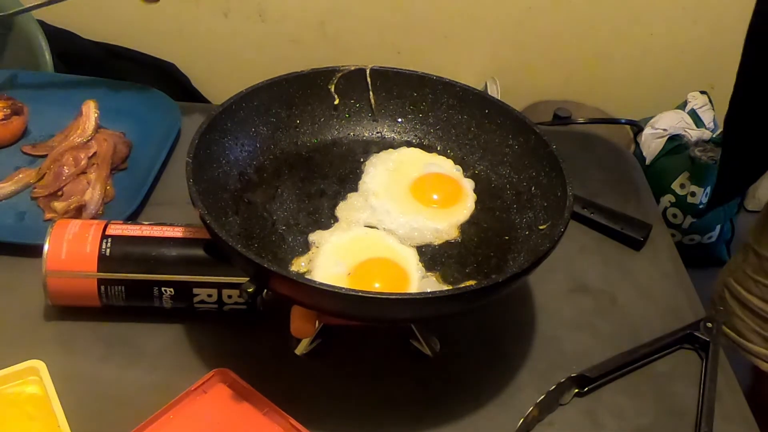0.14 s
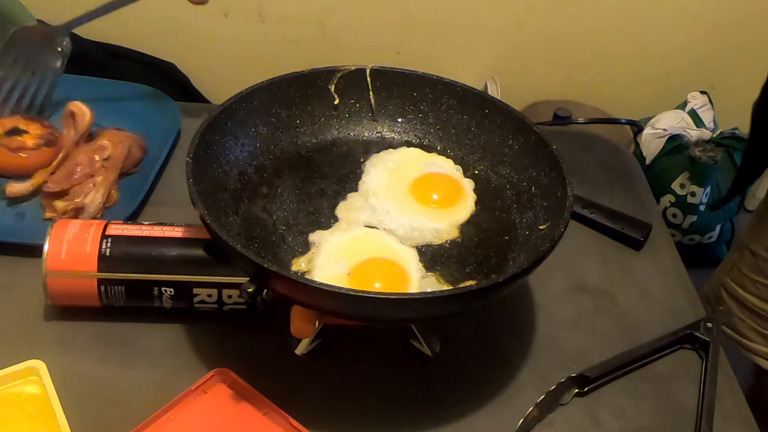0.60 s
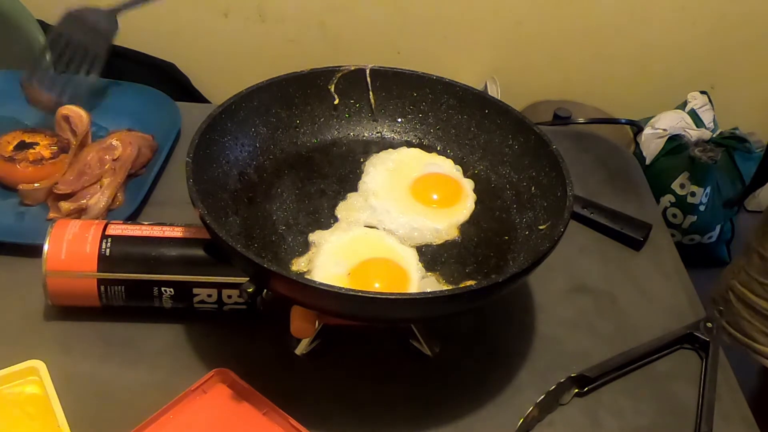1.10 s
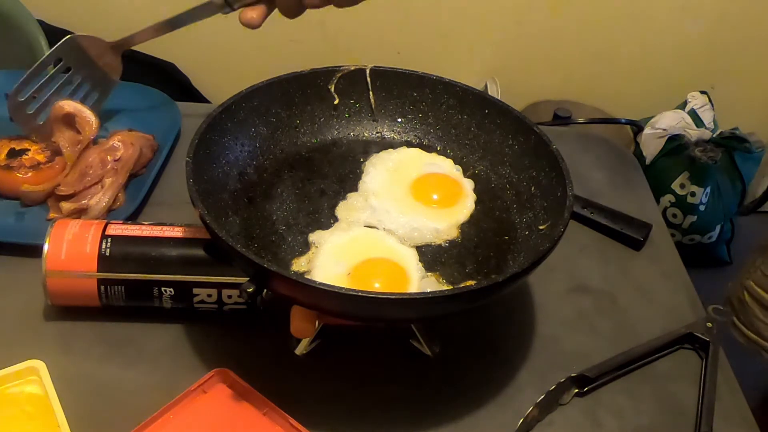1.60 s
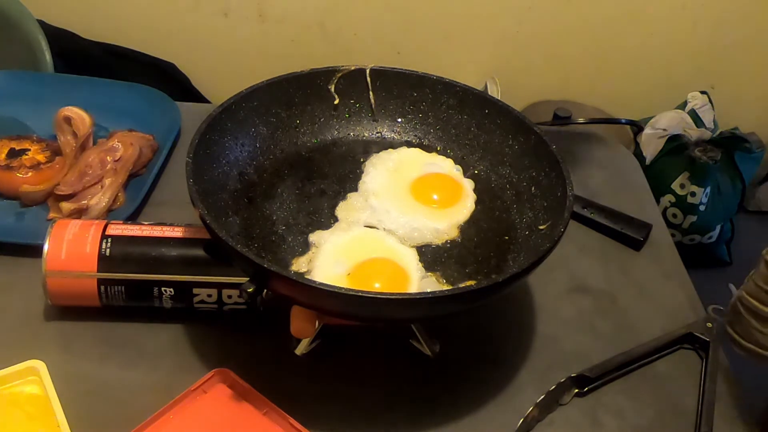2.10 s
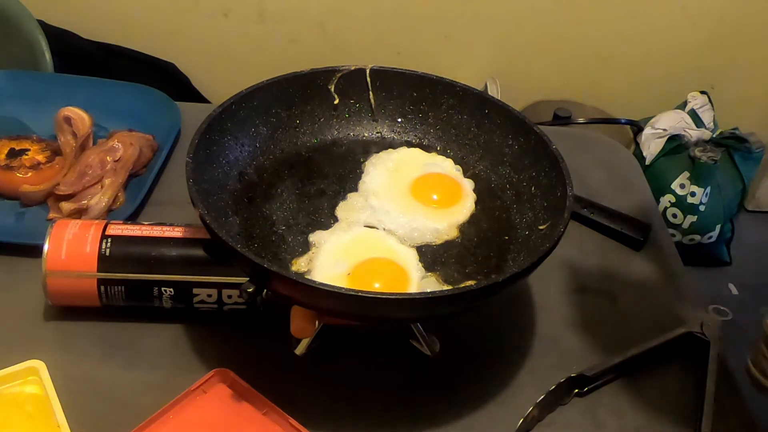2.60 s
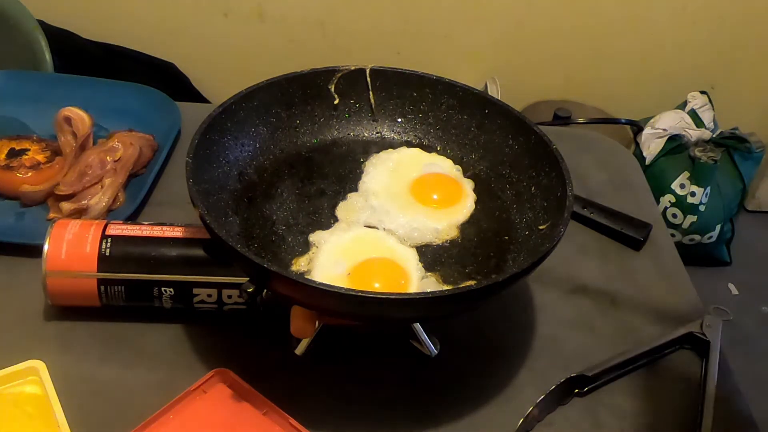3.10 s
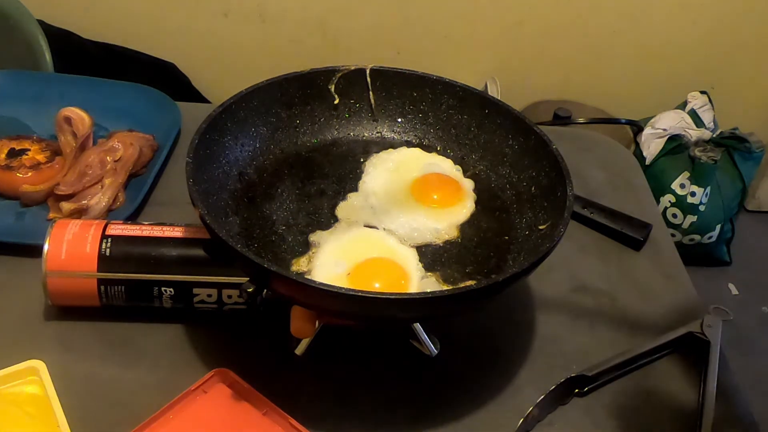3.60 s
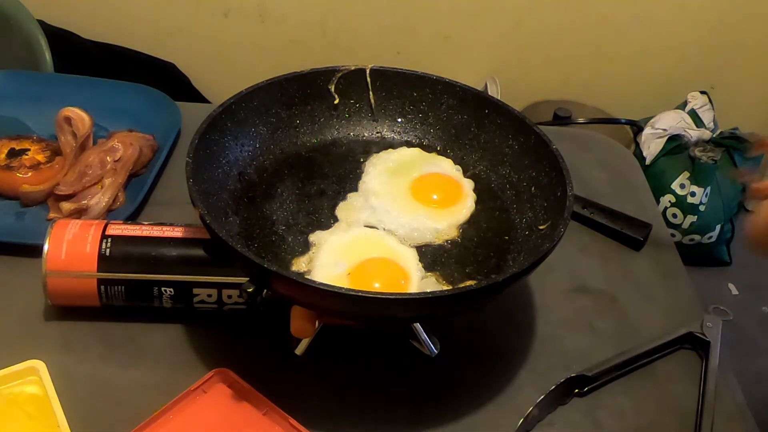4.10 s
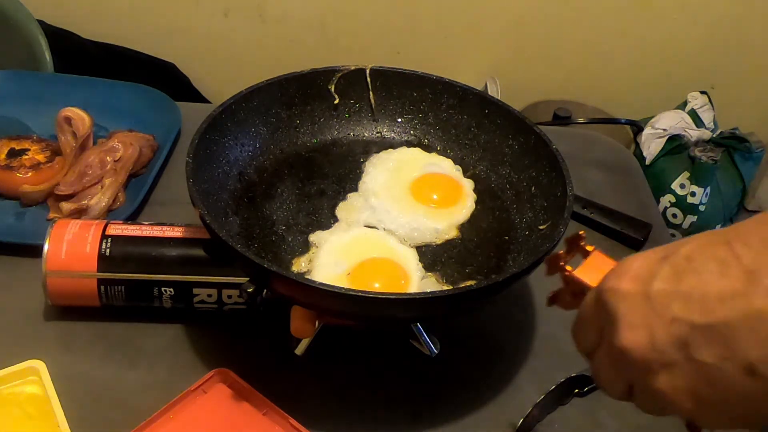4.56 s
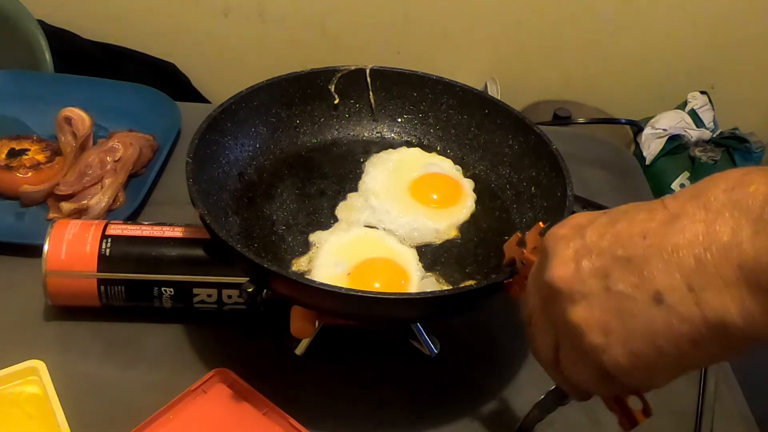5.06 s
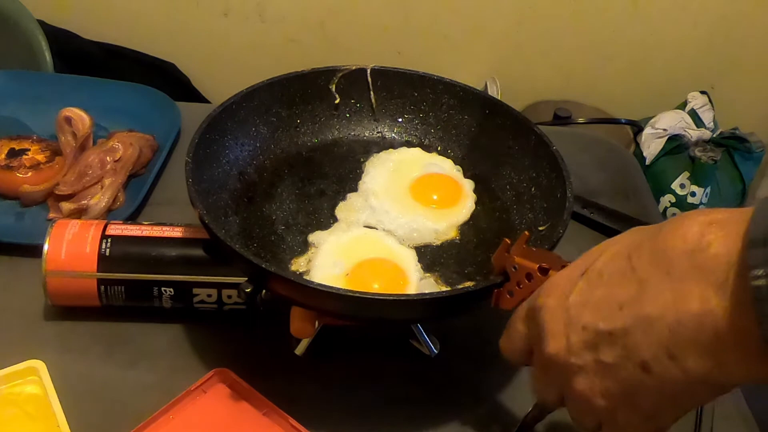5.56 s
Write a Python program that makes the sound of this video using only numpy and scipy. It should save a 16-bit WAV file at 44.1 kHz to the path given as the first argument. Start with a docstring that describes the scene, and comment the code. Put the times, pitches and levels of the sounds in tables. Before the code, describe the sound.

Eggs sizzle in a pan over a softly hissing gas flame, popping sharply, after a double tap on plastic and before metallic clinks.

```python
"""Two quick knocks of a spatula on a plastic tray come first, with fat already sizzling behind them.
Two eggs fry in a pan on a small gas burner in a hard-walled corner, close to the microphone. Steam bubbles
crack and ring: small ones in swarms as a sizzle, large ones as pitched spits and deep plops. Struck tray
and metal tool ring in modes; drag, rustle, flame and rumble are shaped noise; echoes and a tail add the corner."""
import sys
import numpy as np
from scipy import signal
from scipy.fft import rfft, irfft
from scipy.io import wavfile
from scipy.ndimage import uniform_filter1d

SR = 44100
rng = np.random.default_rng(int(sys.argv[2]) if len(sys.argv) > 2 else 0)


def pcm_store(signal):
    """Save signal as 16-bit PCM."""
    levels = np.round(np.clip(np.atleast_2d(signal), -1, 1) * 32767)
    wavfile.write(sys.argv[1], SR, levels.astype(np.int16).T)


def voltage_ratio(level):
    """Linear amplitude factor for a level in decibels (scalar or array-like)."""
    return 10 ** (np.asarray(level, float) / 20)


N = 250929  # length in samples

# In all tables levels are before panning, room and microphone; colours give only the shape of a spectrum.
# loudest bursting bubbles: start_s, level_db, pitch_hz, ring_cycles, crack_db (against the ring)
SPITS = [(.2253, -27.5, 6700, 3.2, -9), (.2404, -27, 6760, 2.8, -14), (.3806, -27, 4550, 3.3, 6),
         (.3835, -28.5, 3630, 1.5, 16), (.4, -20.5, 4160, 3.7, -25), (.476, -27.5, 5300, 3.0, 2.5),
         (.543, -29, 9200, 2.4, -11), (.5804, -27.5, 6330, 2.3, -5), (.6177, -30, 6200, 3.0, -18),
         (.6404, -34, 3840, 3.3, 11.5), (.7138, -24.5, 5880, 4.2, -15), (.7701, -26, 5540, 4.8, -3),
         (.78, -31, 6200, 2.8, -15), (.845, -26.5, 3200, 1.3, -2.5), (.9692, -29, 6850, 2.6, -11),
         (1.1051, -21.5, 3810, 1.8, -12), (1.1124, -29, 3760, 2.1, -7), (1.136, -30, 7000, 2.4, -6),
         (1.2584, -31, 3460, 2.4, -11), (1.3458, -22.5, 3320, 1.6, -1.5), (1.3539, -21, 9210, 3.0, -7),
         (1.3614, -28, 3770, 3.0, -7), (1.3694, -29, 3680, 1.2, 4.5), (1.3774, -24.5, 3190, 1.8, -3),
         (1.4446, -29, 3660, 3.0, -4), (1.4635, -28, 4900, 3.3, -11), (1.517, -25, 7000, 3.5, -12),
         (1.5947, -32.5, 7880, 2.2, 14.5), (1.6004, -28, 9300, 3.0, -7), (1.7629, -24.5, 11000, 1.9, -3),
         (1.956, -35, 8840, 2.2, 3), (2.0532, -33, 9000, 1.5, 7), (2.0607, -26, 5980, 4, -3),
         (2.496, -31, 12500, 2.5, -9), (2.5633, -26, 5530, 2.2, -14), (2.582, -29, 6000, 2.8, 4),
         (2.6256, -23.5, 4080, 2.6, -5), (2.6785, -18, 8720, 1.5, 1.5), (2.6862, -22, 7700, 1.6, 3),
         (3.2614, -32.5, 6530, 3.0, -14), (3.3446, -32, 9400, 3.8, -9), (3.349, -31, 9140, 5.8, -12),
         (3.447, -30, 9000, 2.8, -4), (3.472, -24.5, 8500, 1.4, -6), (3.6325, -29, 3470, 2.2, -12),
         (3.824, -33, 7140, 1.9, 1.5), (3.9698, -33, 8090, 3.3, 3), (3.9774, -19.5, 5300, 2.9, -14),
         (4.0306, -20.5, 4640, 4.3, -9.5), (4.1687, -26.5, 3080, 1.1, 4), (4.2382, -33, 8500, 1.5, 5),
         (4.2438, -27.5, 3350, 1.8, -3), (4.2854, -24, 6800, 1.9, -5), (4.3084, -27, 6000, 2.2, -11),
         (4.7355, -31, 8130, 3.0, -7), (4.8485, -32, 7300, 2.7, -7), (5.138, -24, 9000, 1.6, -6),
         (5.1739, -33, 5400, 4.9, .6), (5.2178, -24.5, 8250, 2.8, -5), (5.449, -33, 8100, 2.2, -2.5),
         (5.5156, -23, 8960, 2.2, 2.5), (5.5435, -29, 8700, 1.8, 7), (5.5826, -28.5, 3240, 1.7, -7),
         (5.645, -31, 12000, 2.2, -3), (5.672, -33, 3200, 2.3, 5)]
# as heard, the bursts have no bass and fade in the top octave: freq_hz, gain_db
BURST_COLOUR = [(100, -50), (700, -12), (1500, 0), (9500, 3.5), (13000, -1.5), (16000, -22)]
# large slow bubbles that plop: start_s, level_db, pitch_hz, ring_cycles, crack_db (against the ring)
PLOPS = [(1.0327, -21.5, 1420, .85, .7), (1.4722, -35, 1010, 2.1, -12.5), (3.5719, -17.5, 1260, 1.55, -6.5),
         (3.6062, -33.5, 1710, 2.1, -10.5), (3.8852, -32.5, 1110, .95, -3.5), (5.2326, -24.5, 1800, .9, -4),
         (5.5614, -30.5, 1810, 5.3, -13.5)]
# strength of the sizzle, before its trim: time_s, level_db
SIZZLE_LEVEL = [(0.0, -45), (.2, -60), (.46, -49), (.78, -57), (1.12, -54), (2.0, -54), (2.52, -48.5),
                (2.71, -53.5), (3.07, -51), (3.2, -55.5), (3.36, -54.5), (3.84, -59.5), (4.15, -58.5),
                (4.28, -51.5), (4.6, -64), (5.13, -57), (5.31, -62), (5.69, -52.5)]
# spectrum of the sizzle filter: freq_hz, gain_db
SIZZLE_COLOUR = [(470, -18), (800, -9), (1320, 3), (1660, -19.5), (2410, -17), (2900, -.6), (4340, -1.5),
                 (4860, -3.5), (6570, -5.5), (9330, -.6), (13000, -18), (16000, -45)]
# a water pocket explodes and sprays fat: start_s, level_db (first 20 ms), spray_s, tilt_db_per_octave, thump_db
SPLATTER = (2.3253, -30.5, .008, .1, -70)
# spectrum of the spray: freq_hz, density_db_per_hz
SPLATTER_COLOUR = [(880, -63), (1500, -33), (2370, -24), (4240, -11), (6300, -11), (7690, -2.5),
                   (8490, -10), (9650, -8), (10700, -22), (12600, -19), (16000, -38)]
# modes of the exploding pocket: pitch_hz, level_db, t60_s
POCKET_MODES = [(3000, -9, .012), (3550, -3, .01), (7600, -3, .01), (9400, -8, .008)]
# spatula blows on the tray: start_s, level_db (first 20 ms), rattle_s, tilt_db_per_octave, thump_db (counter)
KNOCKS = [(.0273, -21.5, .0085, .3, -29.5), (.0452, -21, .021, -.3, -28.5), (.2873, -36, .004, 1.6, -28.5)]
# modes of the plastic tray: pitch_hz, level_db, t60_s
TRAY_MODES = [(438, -4, 0.1), (493, -7, 0.06), (614, -8, 0.053), (800, -8, .06), (1154, -11, 0.045),
              (2040, 5, .03), (3200, -18, 0.045), (4260, -16, 0.02)]
# spectrum of the crack on the tray: freq_hz, density_db_per_hz
TRAY_COLOUR = [(24, -65), (50, -40), (160, 5), (284, -11), (432, -6), (582, -5), (1000, -11.5), (3220, -16),
               (8910, -38.5), (15000, -79)]
# metal tool hitting and bouncing: start_s, level_db (first 20 ms), rattle_s, tilt_db_per_octave, thump_db
CLATTER = [(4.4819, -46, .0021, -2.5, -56), (4.4858, -25.5, .0036, 1.6, -50),
           (4.4937, -24.5, .0034, .9, -50), (4.5097, -22.5, .0028, -2.2, -40),
           (4.5172, -32, .0042, 4.2, -56), (4.6182, -48, .0042, -6.5, -42), (4.6522, -47, .0042, -1.1, -52),
           (4.69, -55, .0042, -3.2, -43), (5.0962, -55, .016, -7.5, -52), (5.254, -31, .004, .7, -53),
           (5.2632, -38, .0032, 4.2, -60)]
# modes of the metal tool: pitch_hz, level_db, t60_s
TOOL_MODES = [(1180, -1.5, .018), (1723, -6, .028), (1980, -27, .5), (2071, -19.5, .75), (2200, -28, .4),
              (2550, -2.5, .011), (2790, -26, .55), (2910, -26, .5), (3800, -5.5, .011), (7530, -9, .009),
              (8540, -7, .009)]
# spectrum of the crack of the tool: freq_hz, density_db_per_hz
TOOL_COLOUR = [(60, -60), (170, -27), (560, -32), (850, -6), (1300, -1.5), (1700, -.6), (2800, -4),
               (4200, -6), (6000, -14), (8200, -8), (9800, -14), (12000, -30), (16000, -48)]
# modes of the counter under every blow: pitch_hz, level_db, t60_s
COUNTER_MODES = [(95, -5, .1), (135, -1.5, .17), (175, -1.5, 0.11), (215, -4, .13), (320, -5, 0.11)]
# spatula strokes on the tray, later a hand on the counter: start_s, rise_s, top_db, sag_db_per_s, end_s
DRAG_STROKES = [(.33, .14, -45, 4, .68), (1.44, .03, -45, 60, 1.61), (1.725, .015, -50.5, 110, 1.84),
                (4.59, .03, -46, 300, 4.66), (5.09, .01, -45, 75, 5.24)]
# spectrum of the drag: freq_hz, density_db_per_hz
DRAG_COLOUR = [(35, -70), (60, -62), (157, -5), (240, -21), (297, -3), (360, -8.5), (490, -10),
               (857, -13.5), (1000, -6.5), (1750, -19), (6000, -23), (7800, -45), (13200, -120)]
# the dragged tray judders on its low resonances: time_s, level_db
JUDDER_LEVEL = [(0.56, -57), (0.622, -39), (0.652, -50), (0.684, -37.5), (0.714, -49), (0.742, -53),
                (0.78, -66)]
# those resonances: pitch_hz, width_hz, level_db
JUDDER_PEAKS = [(283, 83, -2), (498, 17, 4), (1000, 54, -16)]
# rustles of cloth or a bag: start_s, rise_s, top_db, sag_db_per_s, end_s
RUSTLE_STROKES = [(.385, .03, -47, 100, .44), (.44, .035, -42, 190, .6), (.61, .028, -50, 70, .73),
                  (2.11, .13, -47, 200, 2.3), (2.425, .025, -41.5, 150, 2.56),
                  (2.835, .028, -39.5, 40, 2.99), (2.975, .125, -31.5, 105, 3.24),
                  (4.6, .03, -47, 30, 4.96)]
# spectrum of the rustle: freq_hz, density_db_per_hz
RUSTLE_COLOUR = [(180, -45), (300, -17), (423, -19), (801, -12.5), (855, -6), (928, -13), (1880, -1.5),
                 (3330, -6.5), (7670, -11.5), (15500, -44)]
# spectrum of the flame: freq_hz, density_db_per_hz
FLAME_COLOUR = [(18, -57), (35, -36), (95, -50), (179, 2.5), (526, -10.5), (721, -6.5), (937, -15),
                (2120, -8.5), (2830, -16), (4910, -12.5), (8980, -13.5), (14400, -34), (15900, -62)]
# burner resonances blown by the gas jet: pitch_hz, width_hz, level_db
JET_PEAKS = [(178, 13.3, -63.5), (736, 8.3, -71), (2780, 190, -58)]
# swells of a dull rumble: start_s, rise_s, top_db, sag_db_per_s, end_s
RUMBLE_SWELLS = [(.4, .03, -64, 35, .85), (1.5, .42, -71, 60, 2.02), (2.5, .17, -69, 3, 2.86),
                 (4.3, .1, -71, 3, 4.7), (4.98, .13, -76, 45, 5.3), (5.35, .25, -61, 90, 5.69)]
# spectrum of the rumble: freq_hz, density_db_per_hz
RUMBLE_COLOUR = [(30, -32), (60, -14), (95, -10), (125, 8), (170, -28), (400, -70)]
# near echoes off pan wall, counter and walls: delay_s, level_db
ECHOES = [(.0013, -12), (.0036, -21.5), (.0064, -9), (.0085, -14), (.011, -10), (0.0175, -40)]
# decay of the room tail: freq_hz, t60_s
ROOM_DECAY = [(150, 0.3), (600, 0.4), (1700, 0.44), (4600, 0.37), (9000, 0.42), (14000, 0.32)]
# likeness of the left and right channels: freq_hz, likeness (1 = identical)
LIKENESS = [(60, 0.55), (250, 0.77), (600, 0.61), (1650, 0.38), (5000, 0.41), (15000, 0.067)]


def bubble(pitch_hz, cycles, crack_db):
    """A bursting bubble: the film cracks, the open cavity rings down and rises a little in pitch."""
    t = np.arange(1500) / SR
    life = t * pitch_hz / max(cycles, .3)
    onset = 1 - np.exp(-t * pitch_hz / .5)
    rising = 1 + 0.017 * np.minimum(life, 3)
    ring = onset * np.exp(-life) * np.sin(2 * np.pi * pitch_hz * t * rising)
    crack = np.exp(-t / .00004)
    return ring + voltage_ratio(crack_db) * crack


def spits():
    """Large bubbles, each at its place in the pan and a hair early or late at the right port; one splatter."""
    pan_left_db, scatter_db = 1.5, 1.5  # the pan sits a little left; bubbles scatter about it
    out = np.zeros((2, N))
    scatter = rng.uniform(-1, 1, (len(SPITS), 2))
    for (start_s, level_db, pitch_hz, cycles, crack_db), (place, early) in zip(SPITS, scatter):
        sound = voltage_ratio(level_db) * bubble(pitch_hz, cycles, crack_db)
        pan_db = pan_left_db + scatter_db * place
        add(out[0], start_s, voltage_ratio(pan_db / 2) * sound)
        add(out[1], start_s + 2.2e-5 * early, voltage_ratio(-pan_db / 2) * sound)
    add(out, *blow(SPLATTER, POCKET_MODES, SPLATTER_COLOUR, ring_db=-4.))
    return coloured(out, BURST_COLOUR)


def plops():
    """Deep bubbles open toward the microphone: the direct sound, and the part that fills the room."""
    out = np.zeros((2, N))
    for start_s, level_db, pitch_hz, cycles, crack_db in PLOPS:
        # a plop that rings longer throws more into the room: 4.5 dB per doubling
        thrown_db = -9 + 4.5 * np.log2(cycles)
        gains = voltage_ratio([[level_db], [level_db + thrown_db]])
        add(out, start_s, gains * bubble(pitch_hz, cycles, crack_db))
    return coloured(out, BURST_COLOUR)


def sizzle(per_s=1200, spread_db=7.4):
    """Swarms of tiny bubbles at 24 pitches, of random strength, scattered over the pan."""
    out = np.zeros((2, N))
    for pitch_hz in np.geomspace(1500, 14000, num=24):
        strength = voltage_ratio(spread_db * np.minimum(rng.exponential(1, N), 3.5))
        bursts = strength * (rng.random(N) < per_s / 24 / SR)
        side_db = rng.uniform(-2.5, 2.5)
        swarm = signal.oaconvolve(bursts, bubble(pitch_hz, 1.88, -2.5) * np.sqrt(pitch_hz))[:N]
        out += voltage_ratio([[side_db], [-side_db]]) * swarm
    return level(SIZZLE_LEVEL) * voltage_ratio(-1.5) * evened(coloured(out, SIZZLE_COLOUR))


def blow(row, modes, colour, ring_db):
    """A short uneven rattle cracks broadly and rings the struck thing; the counter thumps under it."""
    start_s, level_db, rattle_s, tilt_db, thump_db = row
    t = np.arange(SR // 2) / SR
    life = t / max(rattle_s, 1e-4)
    # contacts come and go every 30 samples
    uneven = voltage_ratio(2.2 * rng.standard_normal(len(t) // 30 + 1)).repeat(30)[:len(t)]
    envelope = (1 - np.exp(-t / .0004)) * np.exp(-life ** 1.26)
    push = envelope * uneven * rng.standard_normal(len(t))
    ring = signal.fftconvolve(push, ringing(modes, t))[:len(t)]
    ring = coloured(ring, [(20, 0), (20000, 0)], tilt_db)  # flat but for the tilt
    sound = evened(coloured(push, colour, tilt_db)) + voltage_ratio(ring_db) * evened(ring)
    thump = ringing(COUNTER_MODES, t) * (1 - np.exp(-t / 0.011))
    # 20 ms is 1/25 of the half second, so rms over the whole is 1/5 of rms over those 20 ms
    return start_s, voltage_ratio(level_db) * evened(sound) / 5 + voltage_ratio(thump_db) * thump


def handling():
    """Spatula on the tray and metal tool by the pan, struck things that ring a little to the left."""
    out = np.zeros(N)
    for row in KNOCKS:
        add(out, *blow(row, TRAY_MODES, TRAY_COLOUR, ring_db=-7.5))
    for row in CLATTER:
        add(out, *blow(row, TOOL_MODES, TOOL_COLOUR, ring_db=-9.5))
    return out * voltage_ratio([[.4], [-.4]])


def dragging():
    """Grainy friction noise, with a judder that stirs the tray's low body."""
    noise = evened(grit(1.36) * paired_noise(DRAG_COLOUR, 1.0))
    judder = level(JUDDER_LEVEL) * evened(narrow(JUDDER_PEAKS))
    return strokes(DRAG_STROKES) * noise + judder


def rustling():
    """Cloth or a bag gives a dense grainy swish of noise."""
    return strokes(RUSTLE_STROKES) * evened(grit(1.36) * paired_noise(RUSTLE_COLOUR, 0.83))


def burner():
    """The flame roars softly as drifting noise; the gas jet blows across narrow resonances."""
    return voltage_ratio(-54.5) * paired_noise(FLAME_COLOUR, 1.34) + narrow(JET_PEAKS)


def rumble():
    """Low patchy noise swells dully in the background."""
    return strokes(RUMBLE_SWELLS) * paired_noise(RUMBLE_COLOUR, 3.1)


def room(x, tail_db=-2.0):
    """Near echoes, then sparse taps of random sign whose bands die at their own speed."""
    taps = np.zeros((2, SR // 2))
    # one tap in every 20 samples
    at = np.arange(300, SR // 2 - 20, 20) + rng.integers(0, 20, (2, (SR // 2 - 301) // 20))
    np.put_along_axis(taps, at, rng.choice([-1., 1.], at.shape), 1)
    hz, t, bands = signal.stft(taps, SR, nperseg=256)
    decay = voltage_ratio(-60 * t / read(ROOM_DECAY, hz)[:, None])
    tail = signal.istft(bands * decay, SR, nperseg=256)[1]
    length = tail.shape[1]
    # the two channels are most alike around 250 Hz and least alike in the treble
    same = np.clip(read(LIKENESS, np.fft.rfftfreq(length, 1 / SR)), 0, 1)
    left, other = rfft(tail)
    tail = irfft([left, same * left + np.sqrt(1 - same ** 2) * other], length)
    tail *= voltage_ratio(tail_db) / np.linalg.norm(tail[0])
    tail = signal.lfilter(*signal.butter(1, 250, "high", fs=SR), tail)  # the tail is thin in the bass
    for delay_s, echo_db in ECHOES:
        tail[[0, 1], round(delay_s * SR) + rng.integers(0, 4, 2)] += voltage_ratio(echo_db)
    return signal.fftconvolve(x, tail, axes=1)[:, :N]


def paired_noise(colour, patchy_db):
    """Two-channel noise of rms 1, most alike around 250 Hz, with patches drifting in time and pitch."""
    frames, hz = N // 256 + 5, np.fft.rfftfreq(1024, 1 / SR)
    a, b, c, d, patches = rng.standard_normal((5, len(hz), frames))
    patches = uniform_filter1d(patches, size=12, axis=0)
    patches = evened(uniform_filter1d(patches, size=12, axis=1))
    same = np.clip(read(LIKENESS, hz), -1, 1)[:, None]
    left, other = a + 1j * b, c + 1j * d
    spectrum = np.array([left, same * left + np.sqrt(1 - same ** 2) * other])
    spectrum *= voltage_ratio(read(colour, hz)[:, None] + patchy_db * patches)
    return evened(signal.istft(spectrum, nperseg=1024, noverlap=768)[1][:, :N])


def grit(depth_db):
    """Random gain that flutters like rough surfaces catching, smoothed over 120 samples."""
    return voltage_ratio(depth_db * evened(uniform_filter1d(rng.standard_normal(N), size=120)))


def narrow(peaks):
    """Noise blown through narrow resonances."""
    out = np.zeros(N)
    for pitch_hz, width_hz, level_db in peaks:
        resonance = signal.iirpeak(pitch_hz, pitch_hz / width_hz, SR)
        out += voltage_ratio(level_db) * evened(signal.lfilter(*resonance, rng.standard_normal(N)))
    return out


def ringing(modes, t):
    """Dying modes of a struck thing."""
    return sum(voltage_ratio(db - 60 * t / t60_s) * np.sin(2 * np.pi * hz * t) for hz, db, t60_s in modes)


def strokes(rows):
    """Gain over time from strokes that climb 18 dB to their top, sag, and let go in 30 ms."""
    t, power = np.arange(N) / SR, np.zeros(N)
    for start_s, rise_s, top_db, sag_db_per_s, end_s in rows:
        late = t - start_s - rise_s
        db = top_db + np.where(late < 0, 18 * late / rise_s, -sag_db_per_s * late)
        release = np.clip((end_s - t) / .03 + 1, 0, 1)
        power += (voltage_ratio(db) * (t > start_s) * release) ** 2
    return np.sqrt(power)


def level(rows):
    """Gain over time from a dB curve, silent outside it, with 39 ms soft ends."""
    t, (time_s, level_db) = np.arange(N) / SR, np.transpose(rows)
    ends = np.clip(np.minimum(t - time_s[0], time_s[-1] - t) / 0.039, 0, 1)
    return voltage_ratio(np.interp(t, time_s, level_db)) * ends


def coloured(x, colour, tilt_db=0.):
    """Causal minimum-phase filter with the given spectrum, tilted about 3 kHz in dB per octave."""
    hz = abs(np.fft.fftfreq(4096, 1 / SR))
    gain_db = read(colour, hz) + tilt_db * np.log2(np.maximum(hz, 600) / 3000)
    log_gain = np.log(voltage_ratio(np.maximum(gain_db, -100)))
    taps = np.fft.ifft(np.exp(np.conj(signal.hilbert(log_gain)))).real[:2048]
    return signal.oaconvolve(x, taps[None] if x.ndim > 1 else taps)[..., :x.shape[-1]]


def read(points, hz):
    """Reads a table on a log-frequency axis."""
    f, value = np.transpose(points)
    return np.interp(np.log(hz + 1), np.log(f + 1), value)


def evened(x):
    """Scales to rms 1."""
    return x / np.sqrt(np.mean(x ** 2) + 1e-20)


def add(mix, start_s, sound):
    """Mixes a sound in at its start time, cut at the end of the mix."""
    part = mix[..., round(start_s * SR):][..., :sound.shape[-1]]
    part += sound[..., :part.shape[-1]]


def scene():
    """Everything that bursts or knocks sounds in the room, over drag, rustle, flame and rumble."""
    near = spits() + sizzle() + handling()
    direct, thrown = plops()
    corner = room(near + thrown)
    return near + direct + corner + dragging() + rustling() + burner() + rumble()


def roll_off(x):
    """The treble ends steeply here."""
    return signal.sosfilt(signal.butter(12, 16510, fs=SR, output="sos"), x)


def record(dry):
    """The microphone drops the deepest bass; its close-set ports hear nearly the same bass."""
    mid, side = (dry[0] + dry[1]) / 2, (dry[0] - dry[1]) / 2
    mid = signal.lfilter(*signal.butter(2, 45, "high", fs=SR), mid)
    side = voltage_ratio(-11) * side + signal.lfilter(*signal.butter(4, 380, "high", fs=SR), side)
    return roll_off(np.array([mid + side, mid - side]))


dry = scene()
out = record(dry)
pcm_store(out)
```